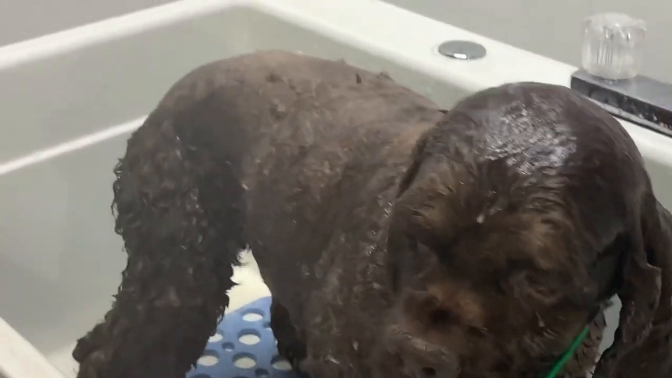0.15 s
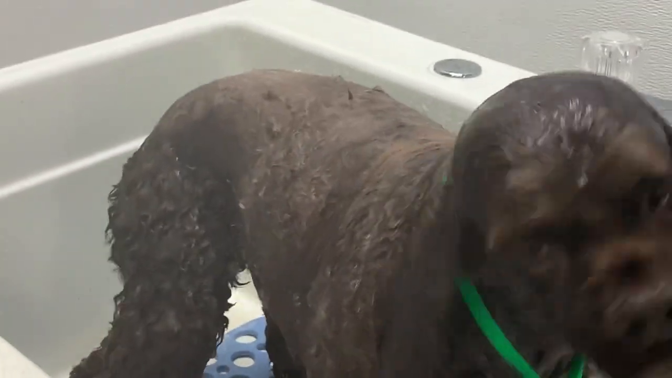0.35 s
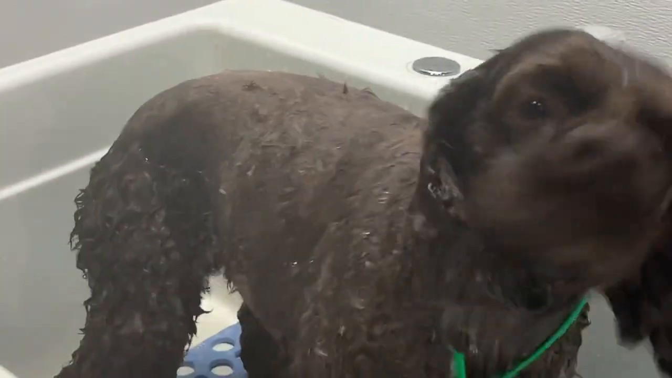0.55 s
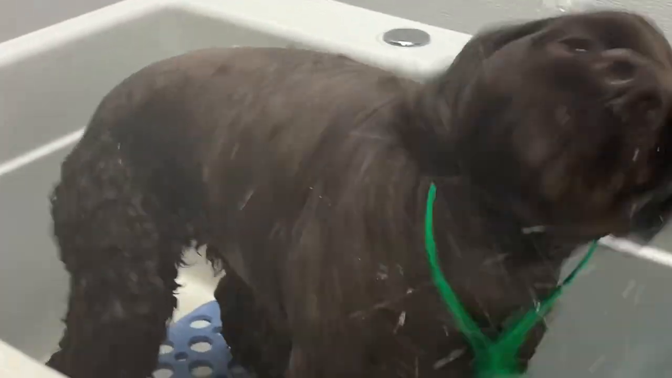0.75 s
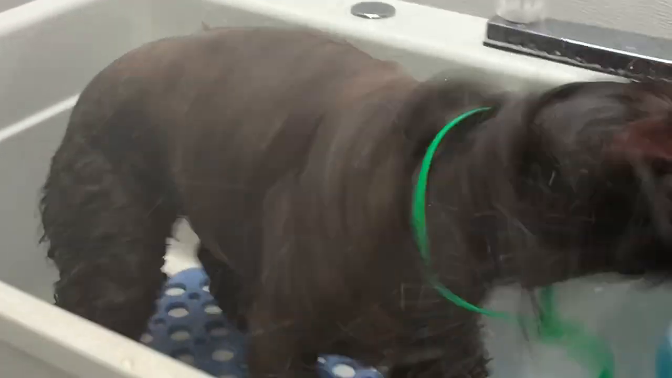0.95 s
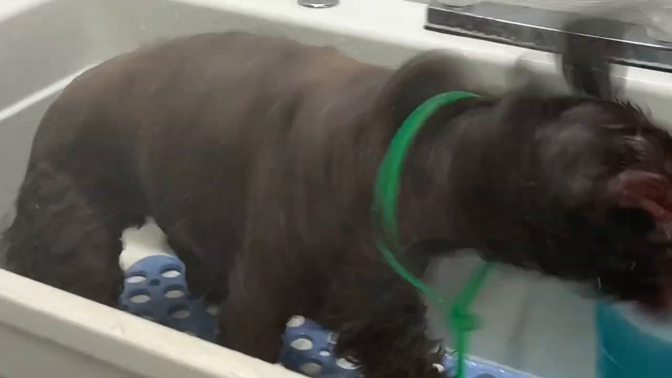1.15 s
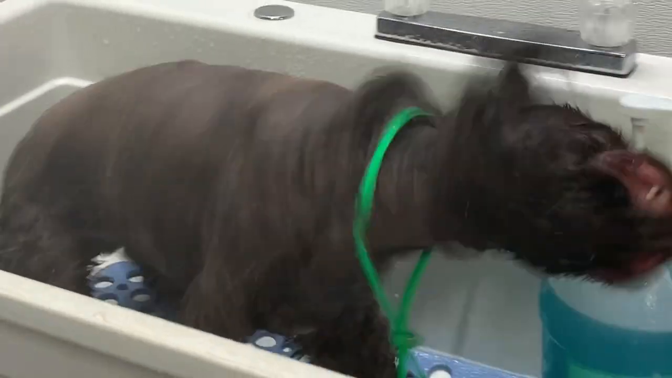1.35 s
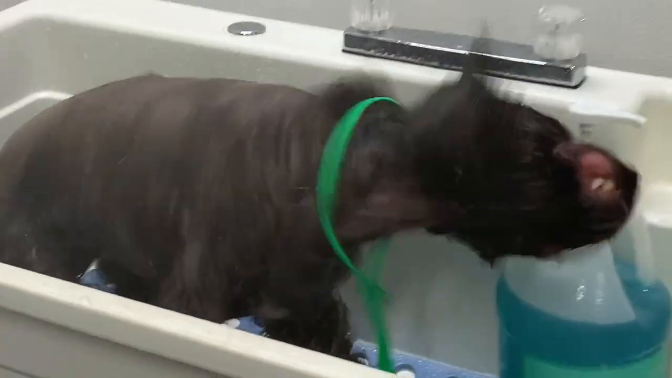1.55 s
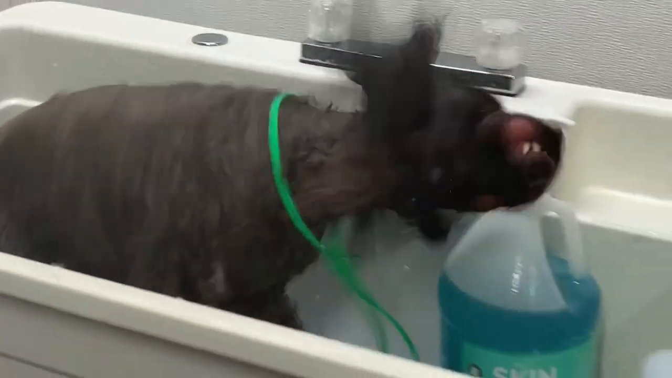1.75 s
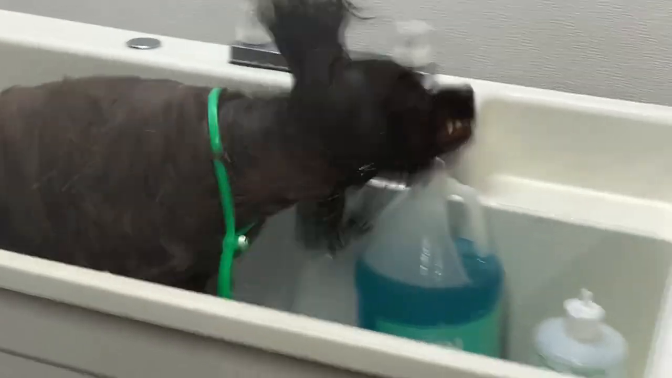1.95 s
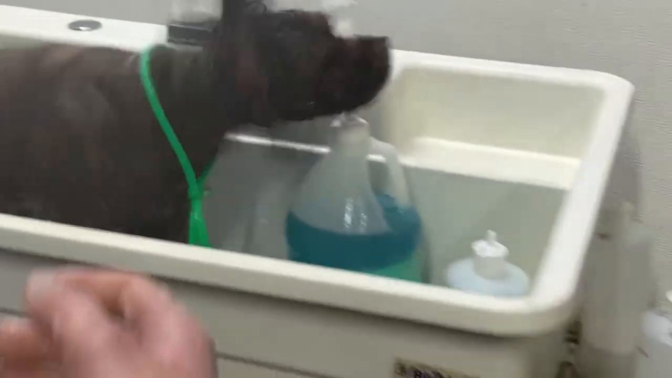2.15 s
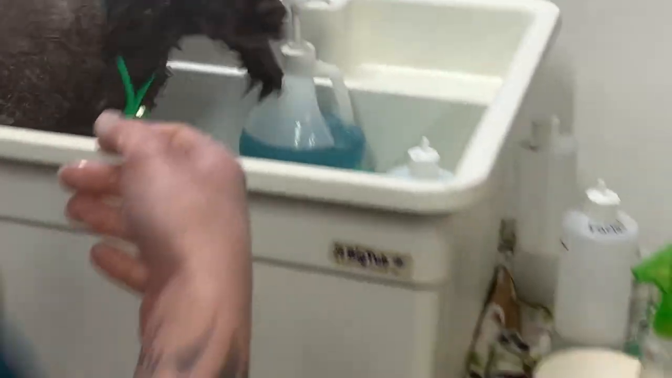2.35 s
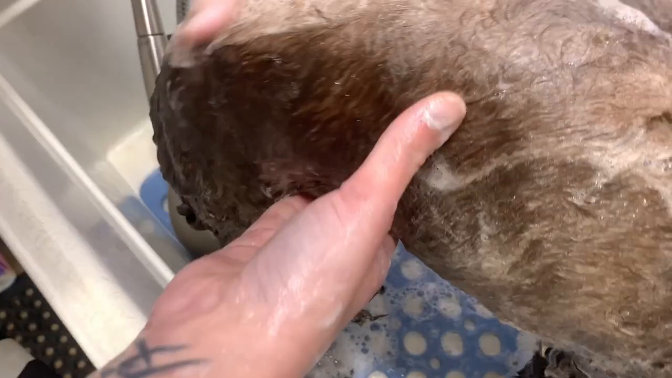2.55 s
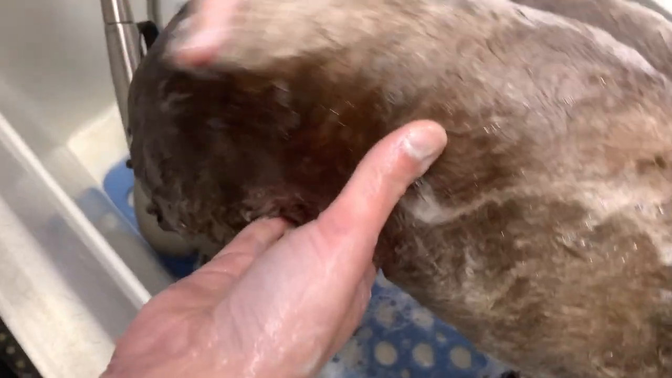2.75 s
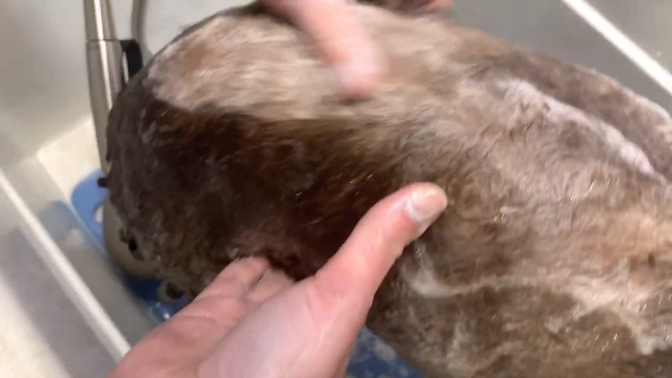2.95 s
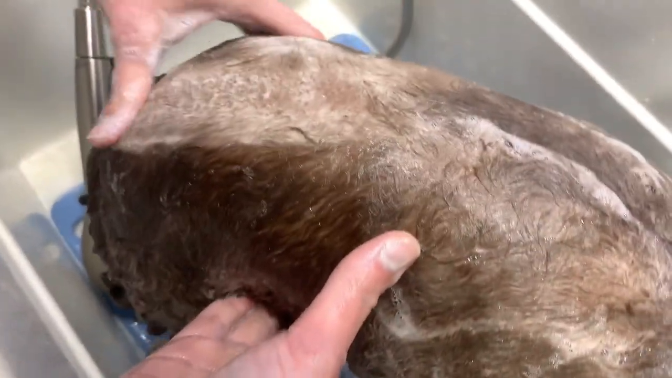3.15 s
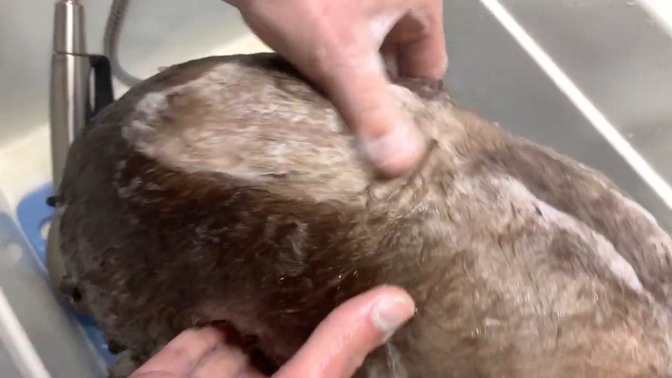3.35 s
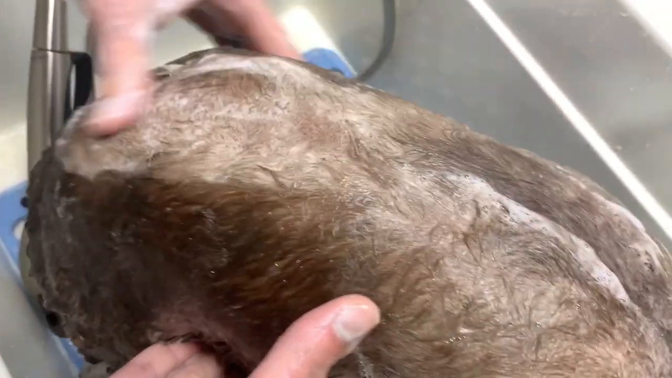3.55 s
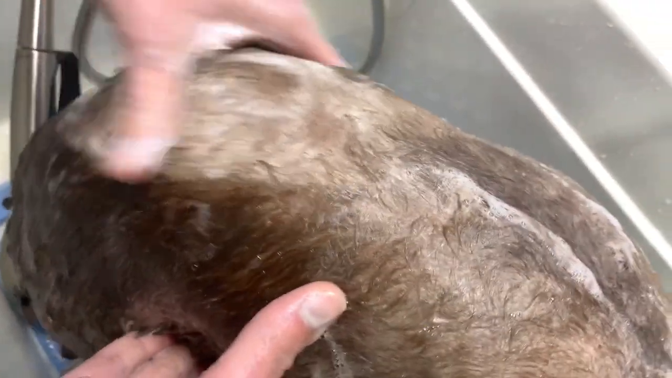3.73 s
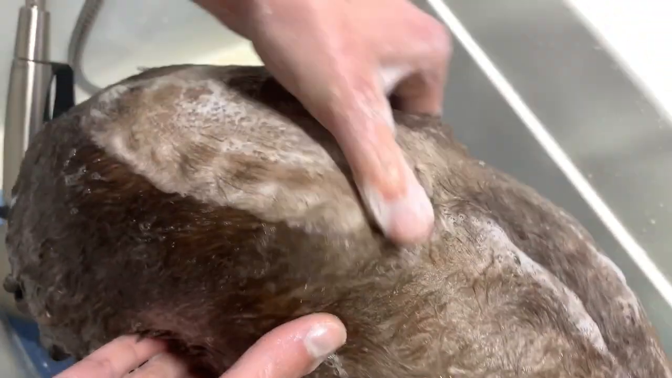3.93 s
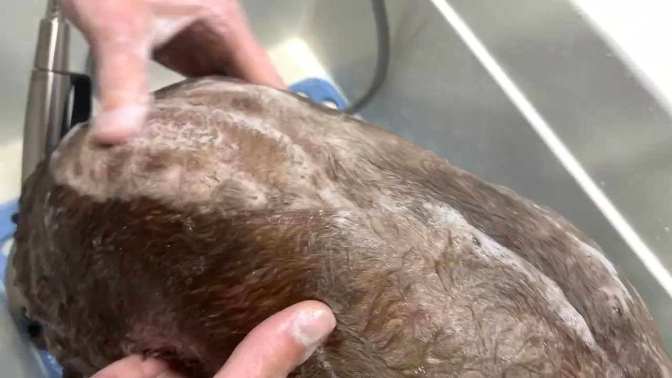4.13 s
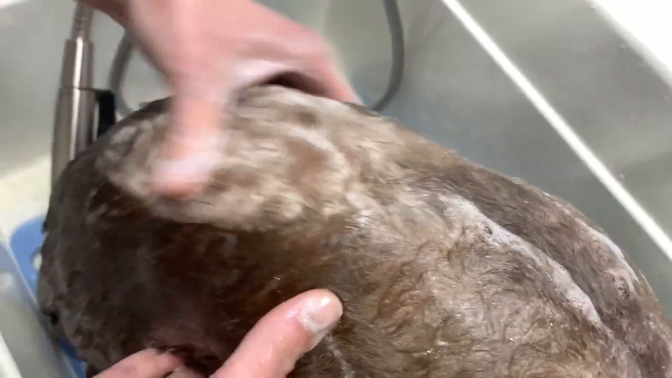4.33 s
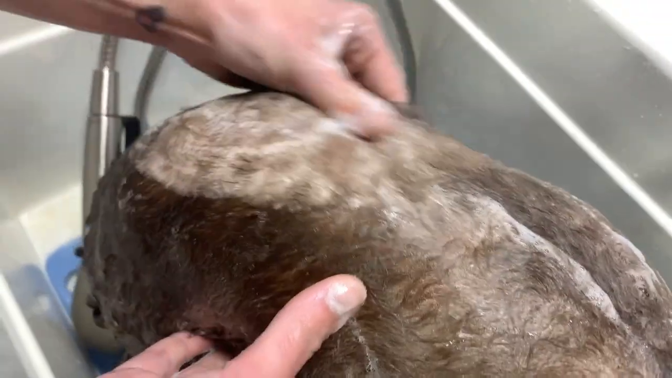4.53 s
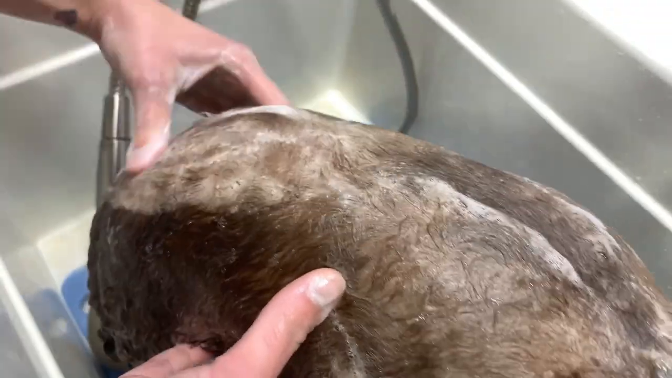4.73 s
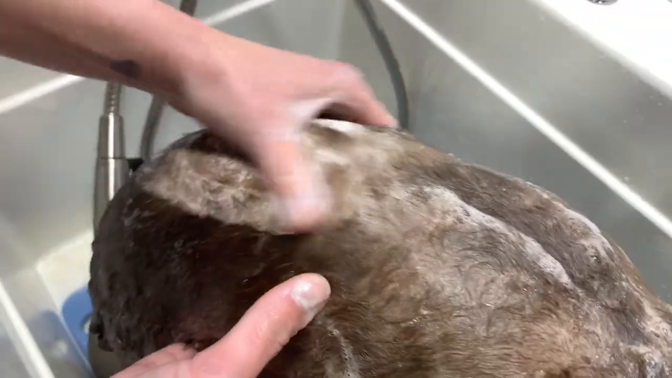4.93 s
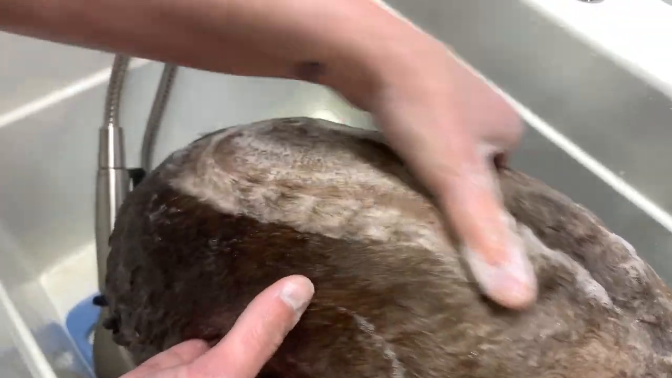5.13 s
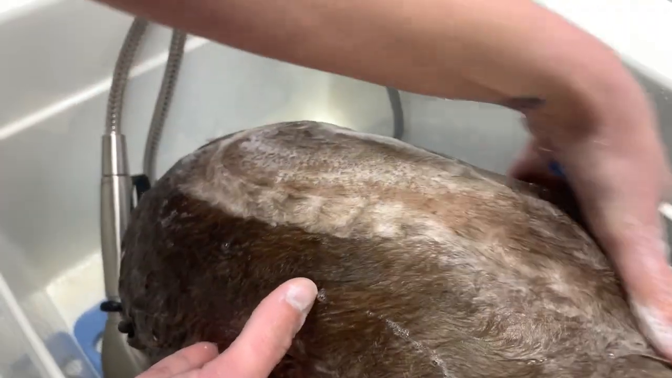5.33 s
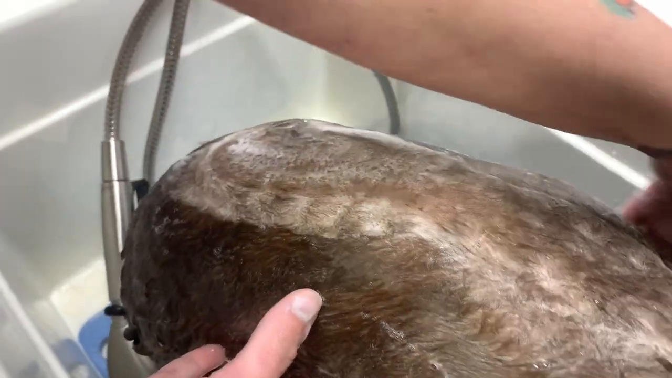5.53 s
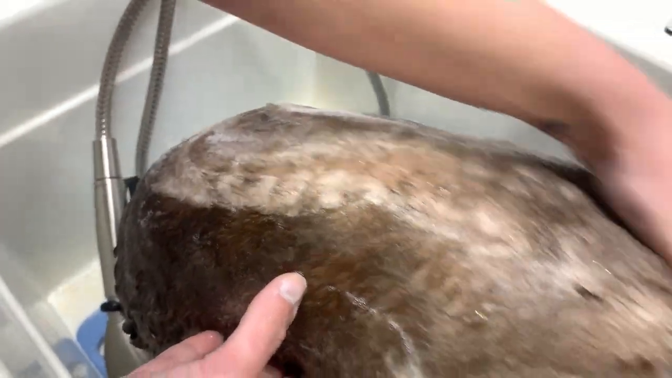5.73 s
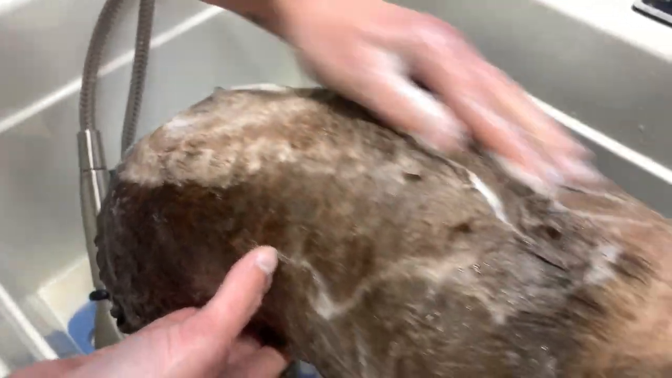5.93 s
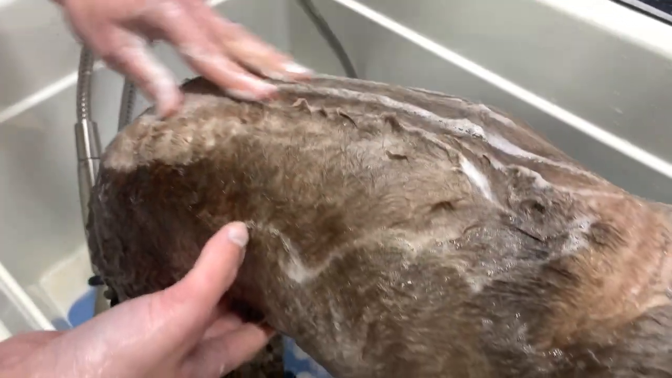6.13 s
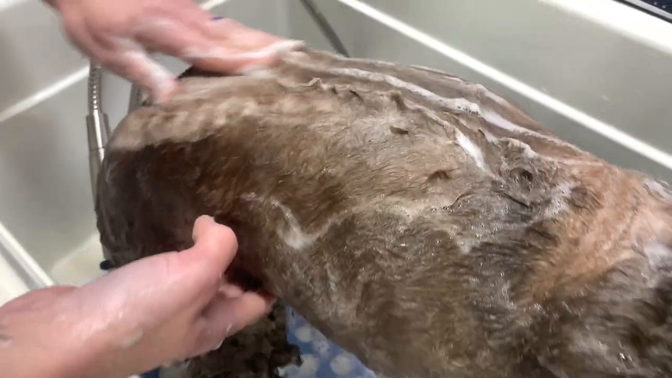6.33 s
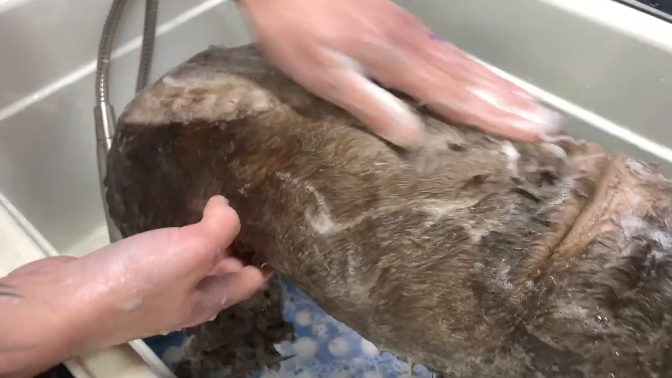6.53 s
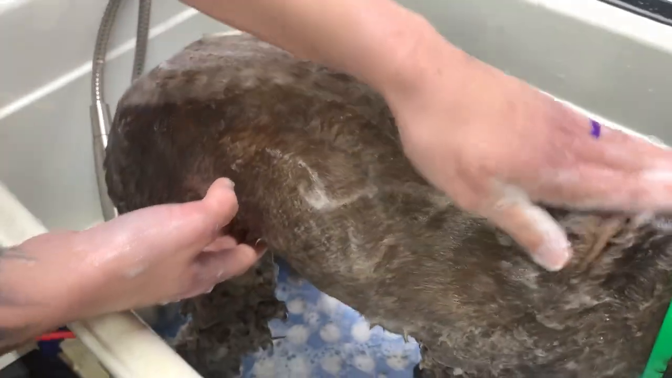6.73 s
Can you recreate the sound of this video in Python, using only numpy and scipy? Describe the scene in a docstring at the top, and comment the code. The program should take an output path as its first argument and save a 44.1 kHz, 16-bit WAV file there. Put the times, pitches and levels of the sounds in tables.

```python
"""Dog shaken and washed in a tub

A wet spaniel shakes itself in a plastic grooming tub: noise bursts slap and crack as ears and coat,
grained noise and ringing ticks form the spray, and swept sines with struck modes thump as paws.
Then a dog is lathered: coloured noise hisses as water, resonant noise squelches, filtered noise strokes
the soapy fur, and a fan rumbles as low noise with sine hum. Paws and squelches occur in both parts.
"""
import sys
import numpy as np
from scipy import signal
from scipy.fft import rfft, irfft, next_fast_len
from scipy.io import wavfile
from scipy.ndimage import uniform_filter1d, map_coordinates

SR = 44100
rng = np.random.default_rng(int(sys.argv[2]) if len(sys.argv) > 2 else 0)


def store_pcm(level_fs):
    """Save levels as 16-bit WAV."""
    pcm = np.round(np.clip(level_fs, -1, 1) * 32767).astype(np.int16)
    wavfile.write(sys.argv[1], SR, np.atleast_2d(pcm).T)


N = 299117
TIME = np.arange(N) / SR
SIZE = next_fast_len(N + SR, True)  # room for decays past the end
FREQS = np.arange(SIZE // 2 + 1) * SR / SIZE + 1e-3  # Hz, kept above zero for the logarithms

# All levels below are relative: a layer may add a trim of its own.
# Twists of the head, each throwing both ears and whipping the coat: [t/s of first ear slap,
# its level/dB, time from first to second ear slap/s, second ear level/dB,
# time from first ear slap to the whip's peak/s (negative: before it), whip level/dB]
HEAD_TWISTS = [(0.697, -48, 0.062, -44.5, 0.046, -52), (0.835, -30.5, 0.042, -28, 0.022, -34),
               (0.944, -26, 0.016, -22.5, -0.0064, -35), (1.032, -32, 0.0282, -21.5, .016, -32),
               (1.123, -34, 0.025, -27, 0.015, -34), (1.244, -28.5, 0.046, -33, .021, -30),
               (1.324, -36.5, 0.02, -27, -0.012, -38), (1.431, -31, 0.02, -32, 0.018, -35),
               (1.505, -30, 0.034, -34.5, .018, -40), (1.599, -43, 0.034, -26, .017, -35),
               (1.694, -33.5, 0.023, -34.5, .016, -38), (1.794, -29, 0.034, -25, 0.017, -34),
               (1.877, -29.5, 0.034, -31.5, 0.02, -36), (1.997, -27.5, 0.014, -32, -.02, -34.5),
               (2.05, -31.5, 0.025, -35, 0.027, -35.5), (2.16, -30, 0.022, -31.5, -.018, -37.5),
               (2.222, -36.5, 0.036, -39.5, 0.092, -52)]
# Sharp cracks: ear tips cracking against the wet coat, and at .482 s a crack on the paw stamp: [t/s, level/dB]
CRACKS = [(.482, -41), (0.694, -39), (0.6987, -38), (0.8287, -26), (.835, -23), (0.8764, -16.5),
          (.926, -28), (.9425, -31), (0.962, -19), (1.029, -31), (1.0625, -24), (1.1218, -14),
          (1.143, -20.5), (1.344, -26), (1.504, -25), (1.6137, -23), (1.631, -16), (1.791, -21),
          (1.804, -18), (1.821, -19), (1.8755, -22.5), (1.997, -29), (2.047, -29), (2.077, -23),
          (2.16, -16.5)]
# Vigour of the shake: [t/s at full vigour, t/s when it slackens, rise/(dB/s), fall/(dB/s)]
HEAD_VIGOUR = (0.93, 2.152, 78, 51)
BODY_VIGOUR = (1.28, 1.57, 42, 15.6)
# Paws stamping, touch then weight: [t/s, knock level/dB, boom level/dB, settled floor pitch f/Hz]
PAW_STAMPS = [(.481, -45.5, -40, 204), (.953, -37, -29.5, 133.6), (1.06, -38.5, -47, 240),
              (1.285, -28, -16.5, 157), (1.296, -37, -23, 89), (1.431, -20, -17.5, 158),
              (1.458, -34, -20.5, 140), (1.474, -29, -32, 183), (1.482, -37, -18.5, 93.4),
              (1.532, -38, -27, 144), (1.582, -39, -34.5, 220), (1.635, -34, -30.5, 198),
              (1.66, -35, -26.5, 113), (1.807, -30, -26.5, 185), (1.855, -41, -23.5, 111),
              (1.908, -44, -32, 154), (2.005, -39, -32.5, 197), (2.203, -41, -35, 197),
              (2.234, -50, -34, 134), (2.302, -45, -53, 237), (5.953, -63, -44.5, 237),
              (6.001, -59, -45, 150), (6.121, -59, -43.5, 238)]
# Resonances of the tub's floor panels, then of its shell: [f/Hz, width/Hz, level/dB]
PANEL_MODES = [(67, 34, -6), (115, 130, -0.5), (194, 127, -3.5), (283, 51, -8)]
SHELL_MODES = [(400, 75, -6), (432, 23, 2.5), (537, 110, -3.5), (760, 160, -4.5), (796.4, 32, 1),
               (1148, 100, -3.5), (1170, 52, -5.5), (1230, 87, -9.5), (1540, 66, -26), (2020, 3100, -23.5)]
# Air pockets in wet fur and lather: [t/s, level/dB, f/Hz]
AIR_POCKETS = [(0.085, -47, 1600), (.603, -58, 2100), (.622, -56, 2500), (0.694, -39, 2920),
               (0.72, -42.5, 1540), (0.833, -30, 2660), (.852, -30, 1530), (.876, -31, 1530),
               (.961, -30, 3570), (1.057, -23.5, 2590), (1.142, -36, 1900), (1.153, -32, 1960),
               (1.283, -24, 1730), (1.476, -26.5, 1110), (1.598, -41, 1450), (1.824, -30, 2640),
               (1.918, -36, 1780), (2.012, -34, 3300), (2.338, -38, 1210), (2.724, -53, 1070),
               (3.019, -44, 3430), (3.827, -51, 1650), (3.869, -53, 1690), (4.355, -56, 1500),
               (4.392, -51, 1440), (4.977, -51.5, 1540), (5.01, -52, 1380), (5.95, -46, 1500)]
# Strokes of paws and hands through wet fur: [t/s of the peak, level/dB, swell/s, fade/s]
FUR_STROKES = [(.088, -46, 0.00069, 0.076), (.485, -53, 0.002, 0.12), (2.75, -57.5, 0.051, 0.3),
               (4.39, -59.5, 0.066, 0.054), (5.96, -53, 0.023, 0.1), (6.65, -57.5, 0.12, 0.6)]
# Running water: [t/s, level/dB of the upper hiss, level/dB of the lower hiss]
WATER_LEVELS = [(2.6, -45, -50.5), (3.18, -43.5, -51.5), (3.29, -42.5, -49.5), (3.81, -44, -49),
                (5.13, -44, -51.5), (5.18, -46.5, -49.5), (6.34, -44.5, -51), (6.78, -50, -52)]
# Sizzle where the jets land: [t/s, centre f/Hz, level/dB]
SIZZLE_PATH = [(2.6, 4220, -57.5), (2.73, 4320, -59.5), (3.24, 4135, -60), (3.81, 4410, -60),
               (4.93, 4100, -59), (5.25, 4460, -59), (5.64, 4112, -59), (6.03, 4350, -53),
               (6.21, 4328, -64.5), (6.27, 4507, -56.5), (6.73, 4194, -59), (6.78, 4490, -65)]
# Motor hum of the fan: [f/Hz, level/dB]
FAN_HUM = [(59.5, -78), (119, -61.5), (134.6, -60.5), (242, -68.5), (361, -69.5), (1195, -82.5)]
# Relative spectral densities of slaps, drops, water, room and fan: [f/Hz, level/dB per Hz]
SLAP_SPECTRUM = [(200, -16.5), (500, -15), (900, -10.5), (1600, -5), (2800, -5), (4200, -4), (5500, -5.5),
                 (7000, -0.5), (9000, 0.5), (11500, -1.5), (15500, -5)]
DROP_SPECTRUM = [(400, 7), (800, -3), (1300, -7), (2200, -4.5), (3500, 0), (5200, -2), (7000, -3.5),
                 (9000, -3.5), (11500, -4), (15500, -6)]
HISS_SPECTRUM = [(900, -22), (1300, -22), (2200, -18), (3150, -17.5), (3700, -10.5), (4400, -14),
                 (5000, -9), (6000, -4.5), (7300, -1.5), (9000, 0.5), (11000, 2.5), (13000, 1),
                 (15500, -1.5)]
ROOM_SPECTRUM = [(25, -4), (50, 0), (130, 5), (200, -9.5), (370, -10.5), (700, -17), (1500, -28),
                 (3000, -38.5), (6500, -20.5), (10000, -26.5), (15500, -26.5)]
FAN_SPECTRUM = [(25, -11), (40, -4.5), (62, 8.5), (100, -3.5), (128, 6.5), (165, -10.5), (260, -9),
                (370, -15), (520, -21.5), (800, -30.5)]
# Left-right correlation of diffuse sound, before any widening: [f/Hz, correlation]
STEREO_LIKENESS = [(100, 0.985), (170, 0.94), (300, 0.65), (600, 0.46), (1500, 0.029), (3500, 0.27),
                   (5500, 0.016), (7000, 0.71), (8550, 1), (9700, 0.9), (10900, 1), (12200, 0.81),
                   (13450, .99), (14600, 0.98), (15700, 0.13)]
# Phase by which the left channel lags the right: [f/Hz, lag/turns]
LEFT_LAG = [(0, 0), (6000, 0), (8550, .5), (10900, 1), (13450, 1.5), (15700, 2)]

# A slap at SLAP_DB has this shape; softer ones last longer, doubling per SLAP_STRETCH_DB, at most twofold
SLAP_DB, SLAP_SWELL_S, SLAP_FADE_S, SLAP_STRETCH_DB = -21, 0.0031, 0.007, 15.5
CRACK_SWELL_S, CRACK_FADE_S = .0002, 0.0017
WHIP_SWELL_S, WHIP_FADE_S = 0.008, 0.017
SPRAY_DB, SKIN_DB, DRIP_DB = -41, -37.5, -66  # flung drops, flapping skin, steady dripping of the coat
FLEX_LAG_S, FLEX_FADE_CYCLES = 0.0033, 1.35  # the floor gives just after the touch
SQUELCH_FADE_S = 0.0085
WATER_ON_S, WATER_RISE_S = 2.552, .02
SIZZLE_TRIM_DB, SIZZLE_WIDTH_HZ = 2, 560  # width of each of two cascaded resonances
ROOM_T60_S = 0.41
CUTOFF_HZ = 15900


def slaps():
    """Superposed impacts: volleys of wet strands within milliseconds, and dry cracks, mostly of the ear tips."""
    strands = tub_walls(texture(colour(SLAP_SPECTRUM), grain_db=3.5, grains_per_s=1400), echo_db=-13.5)
    strands = shifting(strands, depth_db=3.0, per_s=45, width_hz=780, size=256)
    volleys = from_db(3.0) * bursts(ear_blows()) * steadied(strands, span_s=0.0036)

    high_pass = 1 / (1 + 1500 / (1j * FREQS))
    tips = steadied(texture(colour(SLAP_SPECTRUM) * high_pass), span_s=0.001)
    cracks = tips * bursts([(s, db - 1.5, CRACK_SWELL_S, CRACK_FADE_S) for s, db in CRACKS])
    return volleys + cracks


def ear_blows():
    """Impact duration: a softer ear slap is longer; rows of t/s, level/dB, swell/s, fade/s, whips included."""
    blows = []
    for s, first_db, gap, second_db, whip_delay, whip_db in HEAD_TWISTS:
        for at, db in ((s, first_db), (s + gap, second_db)):
            stretch = 2 ** min((SLAP_DB - db) / SLAP_STRETCH_DB, 1)
            blows.append((at, db, SLAP_SWELL_S * stretch, SLAP_FADE_S * stretch))
        blows.append((s + whip_delay, whip_db, WHIP_SWELL_S, WHIP_FADE_S))
    return blows


def shaking_coat():
    """Amplitude modulation by vigour: the head's drives the patter of spray, the body's the skin's flutter."""
    spray = tub_walls(texture(colour(DROP_SPECTRUM), grain_db=0.0, grains_per_s=750), echo_db=-9.0)
    spray = shifting(spray, depth_db=4.0, per_s=70, width_hz=339, size=256)
    drops = spray * from_db(2.7 * drift(90) - 0.7) + from_db(-4.5) * droplets()
    drop_gain = np.hypot(from_db(SPRAY_DB) * vigour(*HEAD_VIGOUR), from_db(DRIP_DB))

    skin_colour = colour([(70, -0.5), (130, 4.5), (240, 3.5), (400, -9.5), (900, -13.5),
                          (2500, -14.0), (8000, -46.0)])
    skin = steadied(texture(skin_colour, side_db=-4.5), span_s=0.032)
    skin_gain = from_db(SKIN_DB) * vigour(*BODY_VIGOUR)
    return (drop_gain * drops + skin_gain * skin) * (TIME < WATER_ON_S)


def vigour(full_s, slack_s, rise_db_per_s, fall_db_per_s):
    """Exponential growth and decay: a gain that builds up, holds at 1 and dies away."""
    below_full = rise_db_per_s * np.maximum(full_s - TIME, 0)
    past_slack = fall_db_per_s * np.maximum(TIME - slack_s, 0)
    return from_db(-below_full - past_slack)


def droplets(per_s=260, count=16):
    """Impulse excitation of resonators: fat drops tick on plastic at one of several pitches, each panned."""
    landings = rng.random(N) < per_s / SR
    sizes = landings * from_db(3.6 * np.minimum(rng.exponential(1, N), 2.5))
    dealt, out = rng.integers(0, count, N), 0
    for k, hz in enumerate(np.geomspace(850, 11000, count)):
        tick = signal.lfilter(*signal.iirpeak(hz, 12.0, fs=SR), sizes * (dealt == k) + 1e-18)
        pan = from_db(rng.normal(0, 7.0) * np.array([[1], [-1]]))
        out = out + rms_one(tick) * pan
    return rms_one(out)


def thumps(boom_fade_s=0.026, knock_fade_s=0.016, low_hz=50, knock_pan_db=2.1):
    """Modal excitation: a paw flexes the floor, knocks the shell, and shakes the panels while it skids."""
    panels = resonances(PANEL_MODES) / (1 + 1j * FREQS / 700) ** 2 / (1 + low_hz / (1j * FREQS)) ** 2
    shell = resonances(SHELL_MODES) / (1 + 1j * FREQS / 4000) ** 2
    knock = struck([(s, db - 0.5) for s, db, _, _ in PAW_STAMPS], shell)

    shudder = steadied(texture(panels, side_db=-5), span_s=0.0156)
    shudder = shudder * bursts([(s + 0.011, db - 6.5, .002, boom_fade_s) for s, _, db, _ in PAW_STAMPS])

    skid = steadied(texture(shell, grain_db=7.5, grains_per_s=740, side_db=-3), span_s=0.0073)
    skid = skid * bursts([(s + 0.00058, db - 0.5, .0007, knock_fade_s) for s, db, _, _ in PAW_STAMPS])
    pan = from_db([[knock_pan_db], [-knock_pan_db]])
    return floor_flex() + shudder + (knock + skid) * pan


def floor_flex(glide=0.74, glide_s=0.0058):
    """Damped oscillation: the floor gives under a paw, its pitch sinking as the dog's weight settles."""
    out, t = np.zeros(N), TIME[:SR // 4]
    for s, _, db, hz in PAW_STAMPS:
        phase = 2 * np.pi * np.cumsum(hz * (1 + glide * np.exp(-t / glide_s))) / SR
        swing = np.sin(phase) * np.exp(-t * hz / FLEX_FADE_CYCLES) * (1 - np.exp(-2 * t * hz))
        out[int((s + FLEX_LAG_S) * SR):][:len(t)] += from_db(db + 7.0) * swing
    return out


def squelches(sharpness=2.24, spatter_db=-19):
    """Cavity resonance: air pockets pop in wet fur at a pitch set by size, with a little broader spatter."""
    out = np.zeros((2, N))
    t = TIME[:SR // 4]
    for s, db, hz in AIR_POCKETS:
        pocket = signal.iirpeak(hz, sharpness, fs=SR)
        fizz = rng.standard_normal((2, len(t))) + rng.standard_normal(len(t))  # partly shared by the ears
        excitation = signal.lfilter(*pocket, fizz) + from_db(spatter_db) * fizz
        ring = rms_one(signal.lfilter(*pocket, excitation))
        envelope = np.exp(-t / SQUELCH_FADE_S) * (1 - np.exp(-t / 0.00082))
        at = int(s * SR)
        out[:, at:at + len(t)] += from_db(db) * ring * envelope
    return out


def rubbing():
    """Friction noise: wet hairs drag and part with a soft crackle."""
    fur_colour = colour([(200, 7.5), (400, 3.0), (800, -3.0), (1400, -2.5), (2300, -5.0),
                         (3200, -9.5), (4300, -15), (9000, -15)])
    fur = texture(fur_colour, grain_db=3.0, grains_per_s=420)
    return bursts(FUR_STROKES) * shifting(fur, depth_db=3.0, per_s=42, width_hz=200)


def water():
    """Turbulent jet noise: a bright hiss whose colour wanders as arm and dog move in front of it."""
    top_db, lower_db = in_time(WATER_LEVELS)
    hiss = tub_walls(texture(colour(HISS_SPECTRUM), grain_db=2.0, grains_per_s=1600), echo_db=-14)
    hiss = shifting(hiss, depth_db=3.5, per_s=18, width_hz=100, size=1024)
    top = filtered(hiss, 1 / (1 + (8500 / FREQS) ** 10))
    hiss = top * from_db(top_db + 6.0) + (hiss - top) * from_db(lower_db + 12.5)
    flutter = from_db(0.8 * drift(45))
    return flutter * hiss + sizzle()


def sizzle():
    """Frequency shifting: a ringing noise band follows, in pitch and strength, the spot the jets hit."""
    hz, db = in_time(SIZZLE_PATH)
    response = resonances([(hz.mean(), SIZZLE_WIDTH_HZ, 0)]) ** 2
    band = shifting(texture(response), depth_db=3.5, per_s=13, width_hz=110, size=1024)
    glide = np.exp(2j * np.pi * np.cumsum(hz - hz.mean()) / SR)
    return from_db(db + SIZZLE_TRIM_DB) * np.real(signal.hilbert(band, SIZE)[:, :N] * glide)


def fan():
    """Flow noise and tones: the low rumble of moving air with a phase-wavering motor hum."""
    hum = sum(np.sqrt(2) * from_db(db) * np.sin(2 * np.pi * hz * TIME + 0.93 * drift(5.2))
              for hz, db in FAN_HUM)
    rumble = texture(colour(FAN_SPECTRUM) / np.sqrt(1 + (FREQS / 1200) ** 4), side_db=4.0)
    return from_db(-49.0) * rumble + hum


def room(x, wall_hz=5000, first_echo_s=0.0051, side_db=2.5):
    """Reverberation: exponentially decaying diffuse reflections, duller than the direct sound."""
    tail = rms_one(rng.standard_normal((2, N))) * from_db(-60 * TIME / ROOM_T60_S) * (TIME > first_echo_s)
    mid, side = rfft(tail / np.sqrt(np.sum(tail ** 2)), SIZE)
    alike = np.clip(over_hz(STEREO_LIKENESS), 0, 1)
    mid = mid * np.sqrt(1 + alike)
    side = side * np.sqrt(1 - alike) * from_db(side_db)
    return filtered(x, np.array([mid + side, mid - side]) / np.sqrt(1 + (FREQS / wall_hz) ** 2))


def tub_walls(x, echo_db, count=6):
    """Comb filtering: close walls return a few echoes within milliseconds."""
    delays = (rng.uniform(.002, .011, count) * SR).astype(int)
    return rms_one(x + from_db(echo_db) * sum(np.roll(x, d, axis=-1) for d in delays))


def shifting(x, depth_db, per_s, width_hz, size=512):
    """Varying reflection: moving surfaces make narrow bands swell and sink at random."""
    hz, s, cells = signal.stft(x, SR, nperseg=size)
    chance = rng.standard_normal((200, 600))
    places = np.meshgrid(hz / width_hz, s * per_s, indexing="ij")
    swell = map_coordinates(chance, places, order=3, mode="mirror")
    return rms_one(signal.istft(cells * from_db(depth_db * swell), SR, nperseg=size)[1][..., :N])


def texture(response, grain_db=0, grains_per_s=2000, side_db=0):
    """Partly coherent noise of unit rms: both ears share its grain; side_db widens or narrows it."""
    alike = np.clip(over_hz(STEREO_LIKENESS), 0, 1)
    impacts = rng.standard_normal((2, N)) * from_db(grain_db * drift(grains_per_s))
    mid, side = filtered(impacts, response * np.sqrt([1 + alike, 1 - alike]))
    side = side * from_db(side_db)
    return rms_one(np.array([mid + side, mid - side]))


def steadied(x, span_s):
    """Power normalization: even out a noise's slow swells, so that a blow has the strength it is given."""
    power = uniform_filter1d(np.mean(x ** 2, axis=0), max(int(span_s * SR), 2))
    return x / np.sqrt(np.abs(power) + 1e-9)


def bursts(rows):
    """Incoherent addition: an envelope of blows (t/s, level/dB, swell/s, fade/s) whose powers add."""
    power = np.zeros(N)
    for s, db, swell, fade in rows:
        near = slice(max(int((s - 10 * swell) * SR), 0), int((s + 10 * fade) * SR))
        t = TIME[near] - s
        power[near] += (from_db(db) * np.exp(np.minimum(t / swell, -t / fade))) ** 2
    return np.sqrt(power)


def struck(blows, response):
    """Impulse response: blows (t/s, level/dB) on a body whose ring peaks at 1 for a blow of 0 dB."""
    s, db = np.transpose(blows)
    ring = irfft(response, SIZE)[:SR // 4]
    clicks = np.zeros(N)
    clicks[(s * SR).astype(int)] = from_db(db)
    return signal.fftconvolve(clicks, ring / np.abs(ring).max())[:N]


def resonances(modes):
    """Modal superposition: parallel damped modes with alternating signs."""
    return sum((-1) ** k * from_db(db) / (1 + 1j * hz / width * (FREQS / hz - hz / FREQS))
               for k, (hz, width, db) in enumerate(modes))


def colour(points):
    """Spectral shaping: the gain of a spectrum, falling away below its first point."""
    return from_db(over_hz(points)) / np.sqrt(1 + (.7 * points[0][0] / FREQS) ** 6)


def over_hz(points):
    """Interpolation on a logarithmic frequency axis."""
    hz, value = np.transpose(points)
    return np.interp(np.log(FREQS), np.log(hz), value)


def in_time(rows):
    """Linear interpolation in time: each column of a curve at every sample."""
    s, *columns = np.transpose(rows)
    return [np.interp(TIME, s, c) for c in columns]


def filtered(x, response):
    """Linear filtering: multiply the spectrum by a frequency response."""
    return irfft(rfft(x, SIZE) * response, SIZE)[..., :N]


def drift(per_s):
    """Random modulation: straight lines between clipped normal values spaced per_s to the second."""
    return np.interp(TIME * per_s, np.arange(N), np.clip(rng.standard_normal(N), -2.3, 2.3))


def from_db(db):
    """Decibel law: level to amplitude gain."""
    return 10 ** (np.asarray(db) / 20)


def rms_one(x):
    """Normalization to unit rms."""
    return x / np.sqrt(np.mean(x ** 2) + 1e-20)


def scene():
    """Superposition: the shake in a quiet room gives way to the wash."""
    washing = np.clip((TIME - WATER_ON_S) / WATER_RISE_S, 0, 1)
    dog = slaps() + shaking_coat() + thumps() + squelches() + rubbing()
    quiet = from_db(-51.5) * texture(colour(ROOM_SPECTRUM), side_db=2.5)
    background = (TIME < WATER_ON_S) * quiet + washing * (water() + fan())
    return dog + from_db(-7.5) * room(dog) + background


def record(dry):
    """Interchannel phase and band limit: the left lags in the treble; the top is cut steeply."""
    lag = np.exp(-2j * np.pi * np.interp(FREQS, *np.transpose(LEFT_LAG)))
    top = 1 / np.sqrt(1 + (FREQS / CUTOFF_HZ) ** 240)
    return filtered(dry, np.array([lag * top, top]))


dry = scene()
out = record(dry)
store_pcm(out)
```